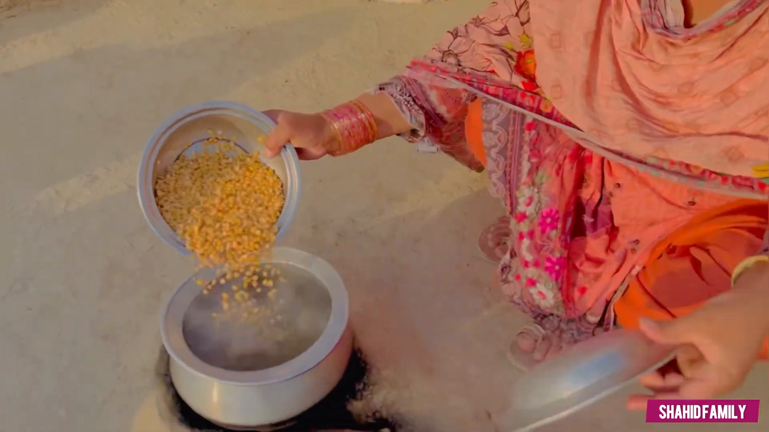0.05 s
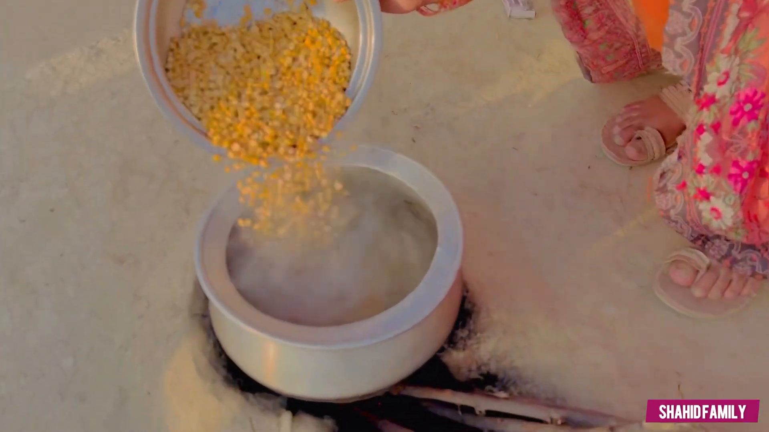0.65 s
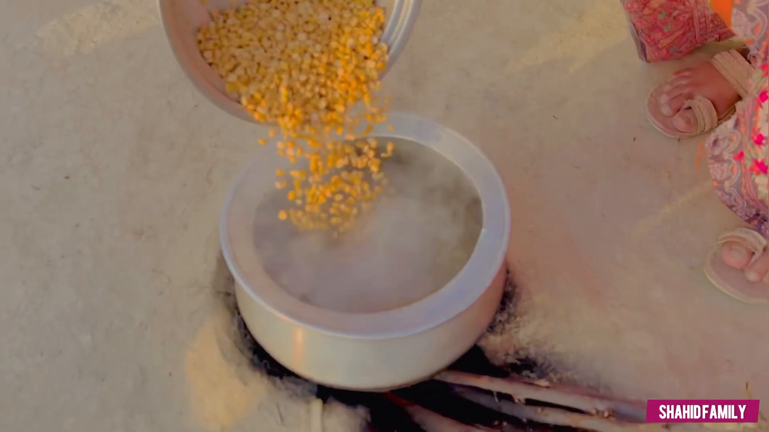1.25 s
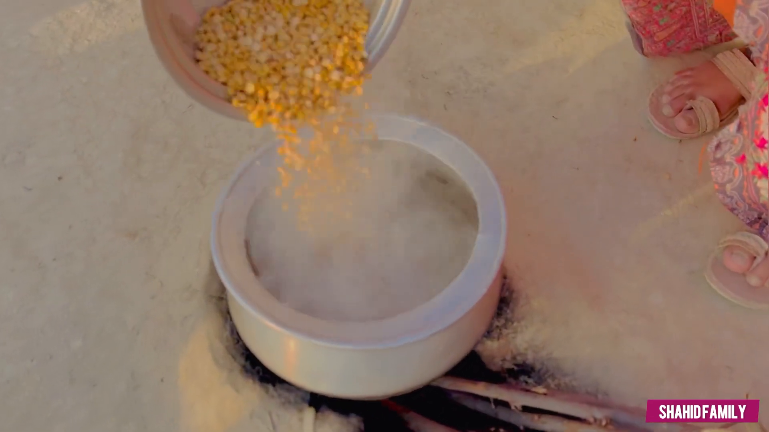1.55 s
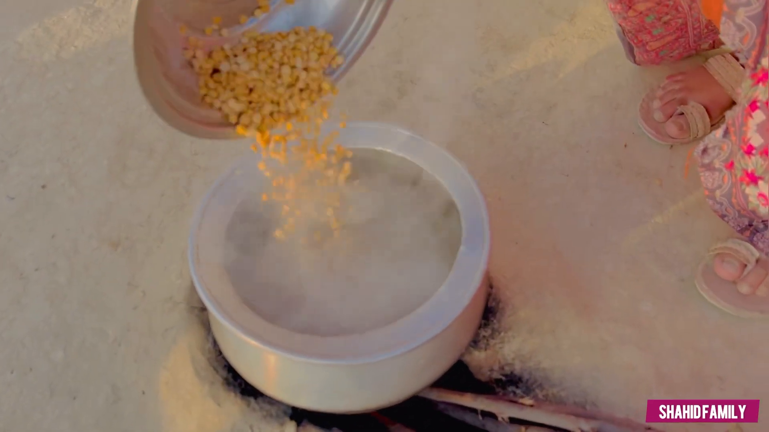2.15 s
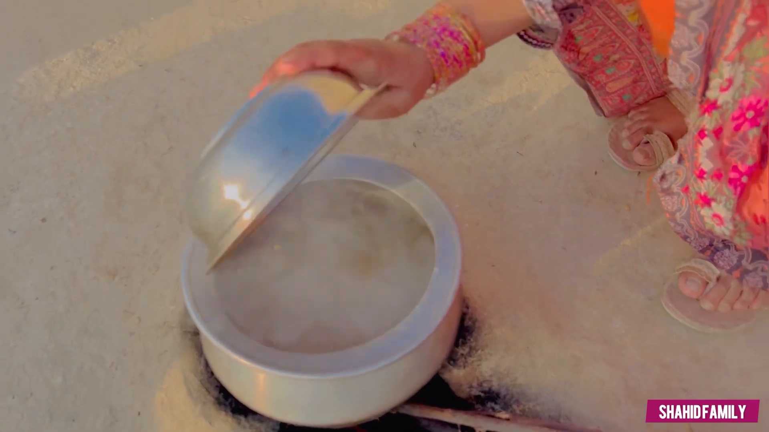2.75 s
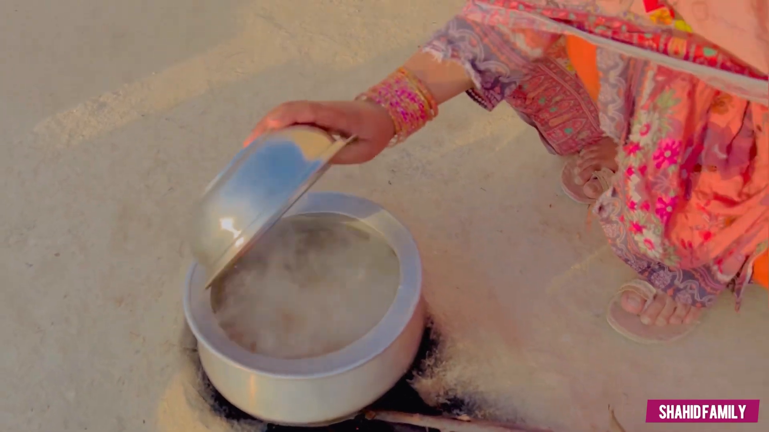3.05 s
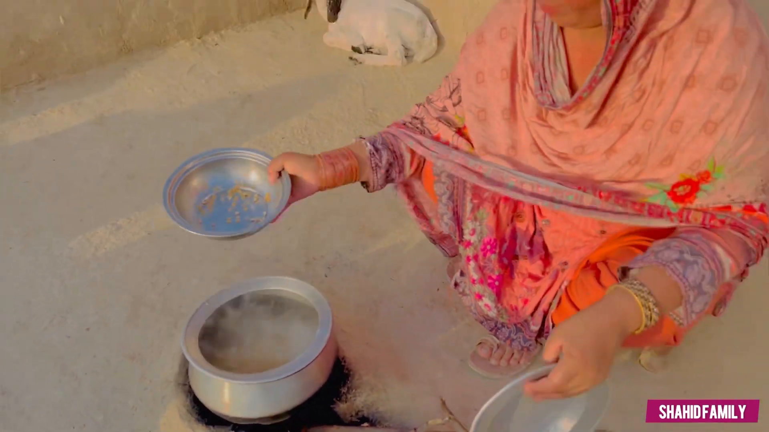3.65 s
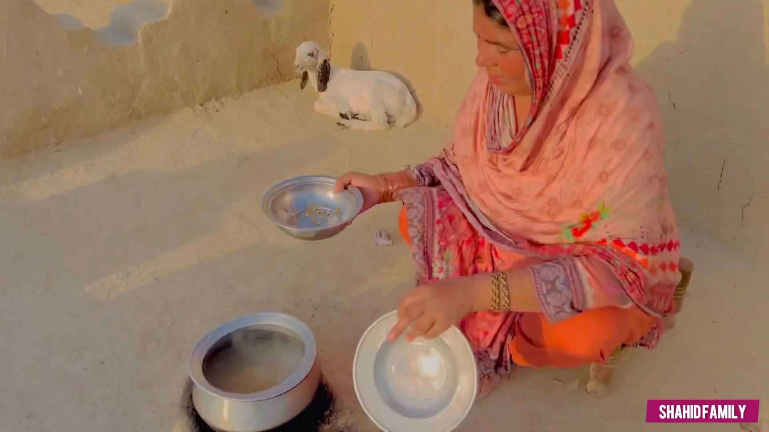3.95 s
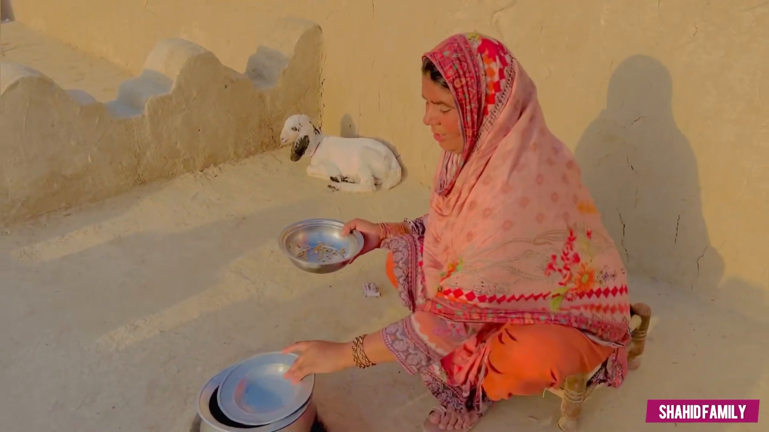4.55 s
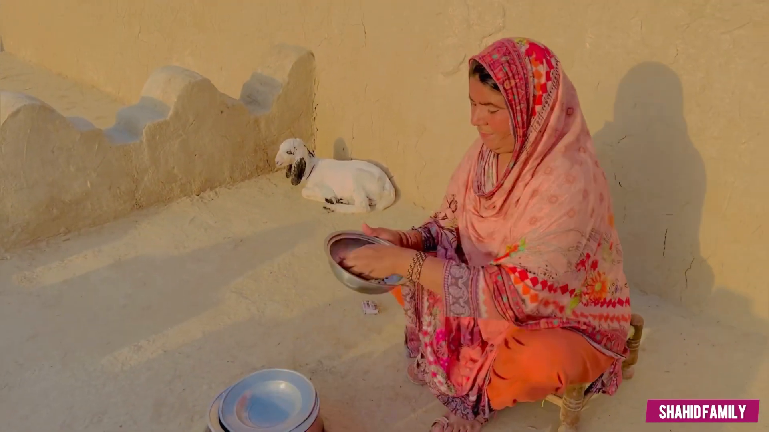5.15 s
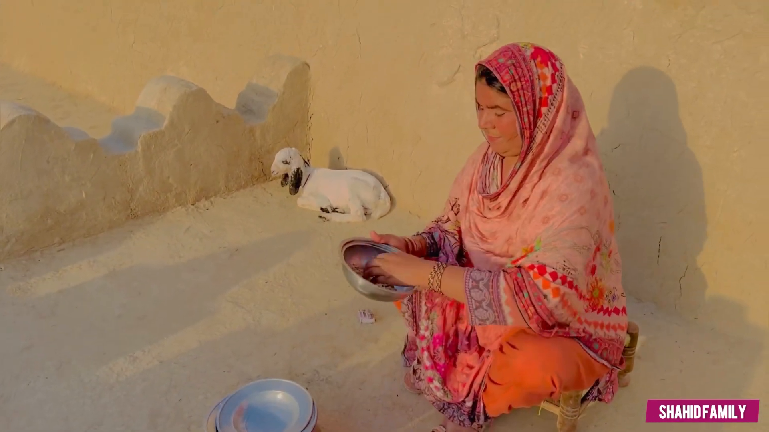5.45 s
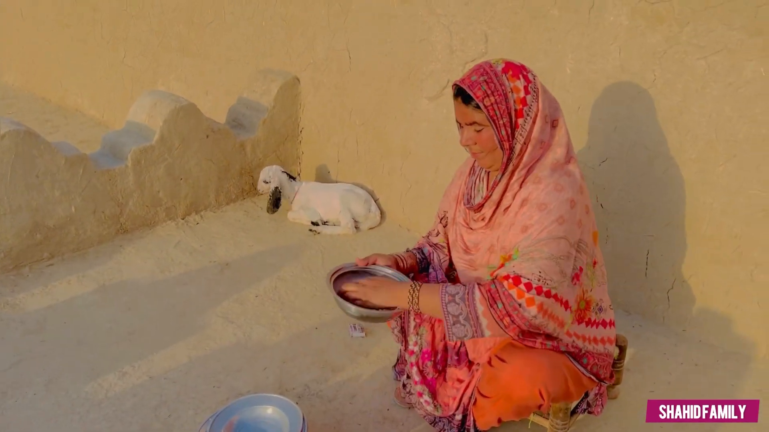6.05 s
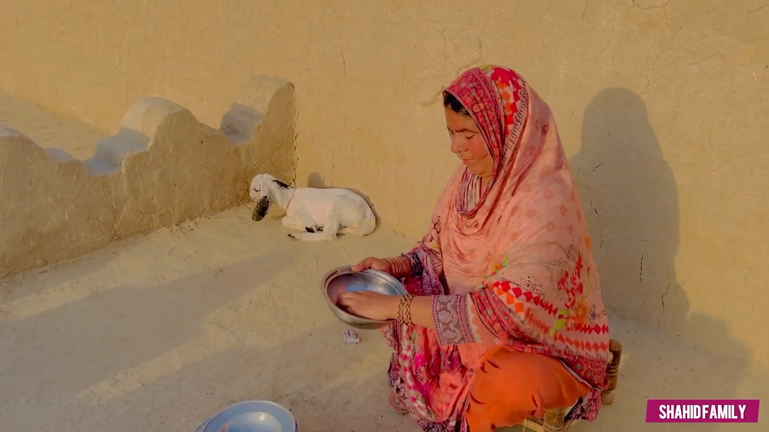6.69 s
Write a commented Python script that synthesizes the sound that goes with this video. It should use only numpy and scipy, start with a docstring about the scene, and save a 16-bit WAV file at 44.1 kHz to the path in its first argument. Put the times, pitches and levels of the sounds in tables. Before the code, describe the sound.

From the start, dry lentils slide out of a steel bowl in a bright, pattering stream that grows louder, with soft plops as they land in a pot of water. The stream runs out around 2.4 seconds, and the last lentils tick down until 2.7. The bowl knocks on the pot's rim at about 2.8, 3.1 and 3.3 seconds, the first and last loudest, each a short clank with a low thud. A sleeve rustles faintly near 4.1. From 4.3 to 4.7 a metal lid clatters and scrapes into place, followed by four barely audible notes from a distant bird. From 5.3 to about 6.9 seconds, fingers wipe around the gritty bowl in quiet passes, with dull bumps, nail ticks, light pings and faint squeaks. The handling sounds are close, over the hush of a yard and a low breeze on the microphone.

```python
"""Dry lentils slide out of a steel bowl and plop into a pot of hot water in a quiet yard.
The bowl is knocked empty on the rim, a metal lid clatters onto the pot and scrapes into place,
then fingers bump and wipe round the gritty bowl. Each contact rings the steel.
A two-port microphone stands close by, a breeze rumbling on it; far off, a bird calls."""
import sys
import numpy as np
from scipy import signal
from scipy.fft import rfft, irfft
from scipy.io import wavfile
from scipy.ndimage import map_coordinates

SR = 44100
rng = np.random.default_rng(int(sys.argv[2]) if len(sys.argv) > 2 else 0)


def persist_wave(psi):
    """Save psi, clipped to +-1, as 16-bit WAV."""
    counts = np.round(np.clip(psi, -1, 1) * 32767).astype(np.int16)
    wavfile.write(sys.argv[1], SR, np.atleast_2d(counts).T)


N = 300762
TIME, FREQS = np.arange(N) / SR, np.fft.rfftfreq(N, 1 / SR)
RING = TIME[:2 * SR // 5]  # time axis of one impact, 0.4 s
EMPTY_S = 2.442  # the bowl runs empty

# spectrum of lentils sliding on steel: freq_hz, level_db
SLIDE_SPECTRUM = [(300, -42), (1500, -10), (1950, -6.5), (2300, 1), (3100, -0.5), (4000, -0.5), (5200, -3),
                  (6500, 0), (8000, 1), (11800, -2), (14000, -2.5), (15000, -19), (16000, -59.5)]
# resonances of the bowl under the lentils: freq_hz, width_hz, boost_db
BOWL_PEAKS = [(2280, 230, 0.5), (3900, 230, 4.5), (4350, 160, 4), (5440, 120, 2), (6550, 120, 4),
              (7710, 260, 10), (8390, 490, 9), (9410, 360, 13), (11340, 440, 12.5)]
# modes of the empty bowl: pitch_hz, level_db, t60_s
BOWL_MODES = [(2290, 5, 0.13), (3324, 9.5, 0.099), (3810, 5.5, 0.075), (4160, 3.5, 0.058), (5620, 11, 0.1),
              (6320, 7, .09), (8200, -5.5, .09), (9700, -4.5, 0.1)]
# spectrum of grit on steel: freq_hz, level_db
GRIT_SPECTRUM = [(200, -10.5), (1000, -17), (1900, -10.5), (2900, -5.5), (3800, -2), (5000, -1.5),
                 (6800, -9), (7600, 0.5), (10000, 3), (14000, -10), (15000, -19), (16000, -13)]
# the lid landing on the rim: start_s, ring_db, crack_db, favoured_hz
LID_HITS = [(4.279, -19.5, -23, 1823), (4.322, -15.5, -14.5, 1713), (4.326, -16, -25.5, 1454),
            (4.335, -18, -20.5, 1725), (4.363, -25.5, -38.5, 827), (4.381, -22.5, -26, 1770),
            (4.411, -27.5, -30.5, 1172), (4.432, -23.5, -30.5, 1440), (4.445, -23, -41.5, 670),
            (4.529, -22, -29, 707), (4.535, -15.5, -16.5, 1450), (4.544, -18.5, -26.5, 1094),
            (4.579, -28, -36.5, 1120), (4.588, -18, -24.5, 1527), (4.594, -21.5, -29.5, 1092),
            (4.629, -28.5, -29, 1150), (4.646, -19.5, -18.5, 1260), (4.694, -34.5, -41, 1080)]
# passes of the hand round the bowl: start_s, length_s, level_db
HAND_PASSES = [(5.322, .01, -48.5), (5.352, 0.14, -45.5), (5.608, .19, -39.5), (5.799, 0.22, -38),
               (6.105, 0.065, -40), (6.2, .14, -51.5), (6.349, 0.22, -37.5), (6.54, 0.04, -30.5),
               (6.67, 0.18, -37.5)]
# spectrum of skin on the bowl: freq_hz, level_db
FINGER_SPECTRUM = [(80, -3.5), (250, 10), (470, 2), (720, 0.5), (850, 0.5), (1150, -1), (1400, -7.5),
                   (1700, 5), (2100, -11.5), (5000, -9.5)]
# resonances of the hand-held bowl under a fingertip: freq_hz, width_hz, boost_db
FINGER_PEAKS = [(449, 63, 8.5), (578, 71, 11.5), (830, 36, 12), (934, 30, 13.5), (1184, 110, 11.5)]


def amp(db):
    """Decibels to gain."""
    return 10 ** (np.asarray(db) / 20)


def unit(x):
    """Scales to rms 1."""
    return x / np.sqrt(np.mean(x ** 2) + 1e-20)


def read(points, hz):
    """Reads a table on a log-frequency axis."""
    f, value = np.transpose(points)
    return np.interp(np.log(hz + 1), np.log(f + 1), value)


def add(mix, start_s, sound):
    """Mixes a sound in at a time."""
    part = mix[max(round(start_s * SR), 0):][:len(sound)]
    part += sound[:len(part)]


def colour(x, spectrum, peaks=(), size=4096):
    """Minimum-phase filter of energy 1 from a spectrum and resonance peaks."""
    hz = abs(np.fft.fftfreq(size, 1 / SR))
    resonance_db = sum(boost / (1 + (2 * (hz - f) / width) ** 2) for f, width, boost in peaks)
    log_gain = np.log(amp(read(spectrum, hz) + resonance_db))
    taps = np.fft.ifft(np.exp(np.conj(signal.hilbert(log_gain)))).real[:size // 2]
    return signal.oaconvolve(x, taps / np.linalg.norm(taps))[:len(x)]


def clicks(per_s, spread_db, size=N):
    """Random impacts of uneven strength, rms 1."""
    place, height, sign = rng.random((size // 4, 3))[:int(per_s * size / SR) + 1].T
    strengths = amp(spread_db * np.minimum(-np.log(1 - height), 5)) * np.sign(sign - .5)
    return unit(np.bincount((place * size).astype(int), strengths, size))


def wander(per_s):
    """Smooth random motion of rms 1, up to a rate."""
    return unit(irfft(rfft(rng.standard_normal(N)) / (1 + (FREQS / per_s) ** 4), N))


def clumps(per_s, depth_db):
    """Random swelling of a level, up to a rate."""
    return unit(amp(depth_db * wander(per_s)))


def held(start, length, attack_s, release_s, sag_db_per_s=0):
    """Envelope of a movement: attack, a hold that may sag, release."""
    t = TIME - start
    sag = amp(-sag_db_per_s * np.clip(t, 0, length))
    return np.clip(t / attack_s, 0, 1) * sag * np.exp(-np.maximum(t - length, 0) / release_s)


def ring(modes, gains=1):
    """Dying modes of random sign, rms 1 at the start."""
    hz, db, t60 = np.transpose(modes)[:, :, None]
    height = amp(db) * gains * rng.choice([-1, 1], hz.shape)
    partials = height * np.sin(2 * np.pi * hz * RING) * np.exp(-np.log(1000) * RING / t60)
    return partials.sum(0) / np.sqrt(np.sum(height ** 2) / 2)


def struck(modes, favoured_hz, lift_db=15.5, width_octaves=0.1):
    """Ring in which the point of contact brings out the modes near one pitch."""
    octaves = np.log2(np.array(modes)[:, :1] / favoured_hz)
    return ring(modes, amp(lift_db * np.exp(-(octaves / width_octaves) ** 2)))


def shimmer(x, low_hz, high_hz, t60, count=45):
    """Drives the crowd of close upper modes of thin steel."""
    hz = low_hz * (high_hz / low_hz) ** ((np.arange(count) + rng.random(count)) / count)
    return unit(signal.oaconvolve(x, ring([(f, 0, t60) for f in hz]))[:N])


def crack(crack_s, tail_db, tail_s):
    """A burst at the contact and the short dense ring of the metal after it."""
    envelope = np.exp(-RING / crack_s) + amp(tail_db) * np.exp(-RING / tail_s)
    return rng.standard_normal(len(RING)) * envelope


def pips(per_s, low_hz, high_hz, t60):
    """Scattered small impacts, each ringing briefly at its own pitch."""
    out, t = np.zeros(N), RING[RING < t60]
    decay = np.exp(-np.log(1000) * t / t60)
    for when, pitch, height in rng.random((int(per_s * N / SR), 3)):
        hz = low_hz * (high_hz / low_hz) ** pitch
        add(out, when * TIME[-1], height ** 2 * np.sin(2 * np.pi * hz * t) * decay)
    return unit(out)


def glides(notes):
    """Short tones that each bend from one pitch to another."""
    out = np.zeros(N)
    for start, length, first_hz, last_hz, db in notes:
        progress = np.linspace(0, 1, int(length * SR))
        hz = first_hz + (last_hz - first_hz) * progress ** 2
        arch = np.sqrt(abs(np.sin(np.pi * progress)))
        add(out, start, amp(db) * arch * np.sin(2 * np.pi * np.cumsum(hz) / SR))
    return out


def lentil_slide(upright):
    """Lentils patter in clumps over the steel, which is less damped as it is laid bare."""
    # spectrum of the bare steel: freq_hz, level_db
    bare_spectrum = [(2000, -29.5), (3000, -10.5), (3600, -0.5), (6600, 9), (7600, -5), (14000, -32)]
    grains = clicks(per_s=2600, spread_db=2.5) * clumps(per_s=95, depth_db=1.98)
    ringing = amp(-8) * shimmer(grains, low_hz=2205, high_hz=13240, t60=0.06)
    stream = colour(grains + ringing, SLIDE_SPECTRUM, BOWL_PEAKS)
    drift = np.cumsum(.008 * wander(per_s=14))  # the shifting load detunes the bowl by about 0.8%
    detuned = map_coordinates(stream, [np.arange(N) + drift], order=3, mode="mirror")
    surging = unit(detuned) * clumps(per_s=11, depth_db=1.2)
    skitter = clicks(per_s=920, spread_db=4.5)
    skitter = unit(skitter + shimmer(skitter, low_hz=3042, high_hz=9420, t60=0.031))
    bare = colour(skitter, bare_spectrum, BOWL_PEAKS)
    flow = held(0, EMPTY_S, attack_s=0.00052, release_s=0.11)
    return (surging * amp(-30.5 - 11 * upright) + bare * amp(-41 - 37 * upright)) * flow


def water_splash(upright):
    """Lentils plop into the water in the hollow pot; a few strays tick on steel."""
    # spectrum of the splash inside the pot: freq_hz, level_db
    splash_spectrum = [(60, -18.5), (125, -3), (210, -10), (340, -10.5), (460, -5.5), (560, 3), (650, 2.5),
                       (760, 0), (900, -9), (1230, -6), (1450, -15.5), (3000, -28.5)]
    strays = colour(clicks(per_s=90, spread_db=1), SLIDE_SPECTRUM, BOWL_PEAKS)
    plops = pips(per_s=60, low_hz=530, high_hz=820, t60=.045)
    splash = colour(clicks(per_s=1100, spread_db=1), splash_spectrum)
    flow = held(0, EMPTY_S + 0.15, attack_s=0.059, release_s=0.15)
    return (splash + .55 * plops + amp(-4.5) * strays) * amp(-42.5 - 5.5 * upright) * flow


def pour():
    """The stream swells as the bowl tips and runs empty; the last lentils drop singly."""
    # last lentils leaving the bowl: start_s, level_db
    stragglers = [(2.34, -23.5), (2.494, -28.5), (2.503, -26), (2.558, -28), (2.655, -48), (2.678, -40),
                  (2.699, -37.5)]
    upright = 1 - np.minimum(TIME / EMPTY_S, 1) ** 0.52  # 1 at the first trickle, 0 at full tilt
    out = lentil_slide(upright) + water_splash(upright)
    last_s = stragglers[-1][0]
    out *= np.exp(-np.maximum(TIME - last_s, 0) / .06)
    for start, db in stragglers:
        tap = rng.standard_normal(len(RING)) * np.exp(-RING / 0.0046)
        add(out, start, amp(db) * colour(tap, SLIDE_SPECTRUM, BOWL_PEAKS))
    return out


def breeze(calming_db_per_s=0.64):
    """Air moving at the microphone: a slowly calming rumble with a few soft buffets."""
    # spectrum of the rumble: freq_hz, level_db
    wind_spectrum = [(15, -42.5), (42, 3), (65, 1), (120, 2), (200, -8.5), (400, -15), (1500, -52)]
    # soft low buffets: middle_s, level_db, pitch_hz
    buffets = [(0.686, -33.5, 56.2), (3.42, -35.5, 95.2), (3.521, -40, 72), (3.635, -33.5, 64.7),
               (3.978, -39.5, 85), (5.166, -45.5, 230)]
    out = amp(-53.5 - calming_db_per_s * TIME) * colour(rng.standard_normal(N), wind_spectrum)
    for middle, db, hz in buffets:
        puff = np.exp(-((TIME - middle) / 0.0115) ** 2)
        out += amp(db) * puff * np.sin(2 * np.pi * (hz * TIME + rng.random()))
    return out


def yard_air():
    """The steady hush of the yard, separate in each channel."""
    # spectrum of the hush: freq_hz, level_db
    air_spectrum = [(150, -25.5), (250, -10.5), (710, -11.5), (1530, -14), (7980, -27), (9660, -31),
                    (10200, -57.5), (11500, -37), (16000, -74.5)]
    return np.array([colour(rng.standard_normal(N), air_spectrum) for _ in range(2)])


def steel_ticks():
    """Hard grains, fingernails and the lid's edge snap against steel; some touches ring the bowl."""
    # spectrum of a snap: freq_hz, level_db
    snap_spectrum = [(500, -42), (3000, -31.5), (7000, -4.5), (11000, 1), (14000, -9), (16000, -11.5)]
    # hard little snaps: start_s, level_db
    snaps = [(.962, -27), (1.137, -24), (1.999, -16), (2.041, -22), (2.266, -14.5), (2.432, -17),
             (2.466, -20), (2.581, -20), (2.606, -22), (2.927, -10.5), (3.274, -21), (5.703, -24.5),
             (5.838, -22.5), (5.896, -25), (6.392, -22.5), (6.777, -28)]
    # nails and a light touch of the rim ringing the bowl: start_s, level_db, favoured_hz
    pings = [(2.927, -40.5, 2630), (5.561, -32.5, 2700), (5.811, -38.5, 4200), (6.095, -42.5, 5270),
             (6.574, -33.5, 4330), (6.586, -38.5, 2290)]
    out = np.zeros(N)
    nails = [(start, db + 7.5) for start, _, db in HAND_PASSES]
    edges = [(start, crack_db - 5.5) for start, _, crack_db, _ in LID_HITS]
    for start, db in list(snaps) + nails + edges:
        snap = crack(crack_s=.0017, tail_db=-20, tail_s=.008)[:SR // 10]
        add(out, start, amp(db + 3) * colour(snap, snap_spectrum))
    for start, db, favoured_hz in pings:
        bowl = struck(BOWL_MODES, favoured_hz)
        contact = colour(crack(crack_s=0.014, tail_db=-15, tail_s=0.012), GRIT_SPECTRUM)
        add(out, start, amp(db) * (amp(4.5) * bowl + amp(3.5) * contact))
    return out


def pot_boom(rise_s, start_hz, end_hz, sag_s):
    """The heavy pot's low thud swells after the blow while its pitch sinks."""
    hz = end_hz + (start_hz - end_hz) * np.exp(-RING / sag_s)
    swell = (RING / rise_s * np.exp(1 - RING / rise_s)) ** 2
    return swell * np.sin(2 * np.pi * np.cumsum(hz) / SR)


def rim_knocks():
    """The hand-damped bowl strikes the rim, each time at another spot; the pot rings and booms."""
    # spectrum of bowl meeting rim: freq_hz, level_db
    knock_spectrum = [(60, -24), (120, -15.5), (250, -5), (400, -8), (600, 0), (950, 1), (1300, -14),
                      (1700, -3.5), (2050, -16), (2400, -3), (3100, -15), (4600, -12), (6000, -16.5),
                      (10000, -17.5), (15500, -36.5)]
    # modes of the pot: pitch_hz, level_db, t60_s
    pot_modes = [(186, -9, 0.22), (406, -15, 0.1), (517, -4, 0.073), (630, -5.5, 0.083),
                 (675, -10.5, 0.067), (932, -14.5, 0.2), (1053, -5, 0.074), (1680, -12, .11),
                 (1845, -12.5, 0.12), (2290, -8.5, .1), (2420, -2.5, 0.073), (3360, -4, 0.049),
                 (3940, -12.5, 0.11), (4563, 6, 0.022), (5270, -10, .04)]
    # blows on the rim: start_s, clank_db, boom_db
    blows = [(2.828, -6.5, -29), (2.857, -20, -30.5), (3.105, -15.5, -28.5), (3.2734, -7.5, -25.5)]
    out = np.zeros(N)
    boom = pot_boom(rise_s=0.019, start_hz=167, end_hz=113.5, sag_s=0.014)
    for start, clank_db, boom_db in blows:
        metal = ring(pot_modes, gains=amp(2.5 * rng.standard_normal((len(pot_modes), 1))))
        contact = colour(crack(crack_s=0.0044, tail_db=-13.5, tail_s=0.023), knock_spectrum)
        clank = amp(-4.5) * contact + amp(-5) * metal
        add(out, start, amp(clank_db) * clank + amp(boom_db) * boom)
    return out


def lid_clatter(seated_s=4.715, choke_s=0.057):
    """Each landing rings the lid and chokes the ring before it; the edge skids along the rim."""
    # modes of the lid: pitch_hz, level_db, t60_s
    lid_modes = [(476, -10.5, 0.16), (664, -13.5, 0.18), (830, -12, 0.055), (1110, -13, 0.13),
                 (1250, -13.5, 0.076), (1470, -8.5, .26), (1560, -13, 0.25), (1708, -9, 0.21),
                 (1880, -12, 0.15), (2192, -12.5, 0.098), (3160, -15, 0.072), (3230, -8, .1),
                 (3460, -9, 0.054), (4440, -21.5, 0.42), (4900, -7.5, 0.077), (5550, -33.5, .12)]
    # spectrum of lid meeting rim: freq_hz, level_db
    clatter_spectrum = [(60, -38), (150, -5.5), (350, -15.5), (700, -10.5), (1100, -4.5), (1600, -10),
                        (2700, -11), (4800, -14.5), (7000, -21.5), (9000, -16), (12000, -35.5),
                        (15500, -46)]
    # skids along the rim: start_s, length_s, level_db
    skids = [(4.344, 0.11, -27), (4.53, 0.14, -33)]
    out = np.zeros(N)
    next_times = [hit[0] for hit in LID_HITS[1:]] + [seated_s]
    for (start, ring_db, crack_db, favoured_hz), next_s in zip(LID_HITS, next_times):
        bend = 1 + 0.009 * rng.uniform(-1, 1)  # pressure on the rim bends the pitch
        choke = np.exp(-np.maximum(start + RING - next_s, 0) / choke_s)
        plate = struck(np.array(lid_modes) * [bend, 1, 1], favoured_hz) * choke
        contact = colour(crack(crack_s=0.0039, tail_db=-5, tail_s=0.017), clatter_spectrum)
        add(out, start, amp(ring_db) * plate + amp(crack_db) * contact)
    skidding = sum(amp(db) * held(start, length, attack_s=.008, release_s=0.038, sag_db_per_s=21)
                   for start, length, db in skids)
    chatter = pips(per_s=220, low_hz=560, high_hz=1900, t60=.035) * skidding
    friction = clicks(per_s=800, spread_db=-0.5) * skidding
    scrape = colour(friction, clatter_spectrum, peaks=[(763, 1400, 9.2), (1735, 270, 3.2)])
    return out + amp(-3) * (scrape + chatter)


def distant_bird():
    """Four faint notes from far off."""
    # the notes: start_s, length_s, first_hz, last_hz, level_db
    chirps = [(4.73, .035, 2850, 2880, -65), (4.79, .035, 2860, 2790, -63), (4.83, .035, 2460, 2400, -67),
              (4.865, .03, 2730, 2790, -63)]
    return glides(chirps)


def hand_wipe():
    """A sleeve rustles; grit crackles under the hand and rings the bowl; the palm rubs dully."""
    # sleeve rustling as the arms move: middle_s, level_db, length_s
    rustles = [(3.656, -67.5, 1), (3.775, -61, 0.073), (3.605, -65, 0.022), (4.106, -45.5, 0.049),
               (5.17, -56.5, 0.016), (5.264, -55.5, 0.058)]
    grit_peaks = [(2290, 150, 3.5), (3340, 130, 5), (3700, 150, 4), (4200, 180, 5), (5660, 200, 6)]
    fine = colour(clicks(per_s=4000, spread_db=3), GRIT_SPECTRUM, grit_peaks)
    fine *= clumps(per_s=60, depth_db=3.4)
    scratch = rng.standard_normal(len(RING)) * np.exp(-RING / .0015)
    scratches = signal.oaconvolve(clicks(per_s=90, spread_db=2), scratch)[:N]
    coarse = unit(colour(scratches, GRIT_SPECTRUM))
    grit = unit(fine + .7 * coarse) * clumps(per_s=22, depth_db=1.5)
    palm = colour(clicks(per_s=390, spread_db=2.5), FINGER_SPECTRUM, FINGER_PEAKS)
    singing = unit(signal.oaconvolve(clicks(per_s=600, spread_db=8.5), ring(BOWL_MODES))[:N])
    rubbing = np.max([amp(db) * held(start, length, attack_s=0.002, release_s=0.042, sag_db_per_s=5)
                      for start, length, db in HAND_PASSES], axis=0)
    sleeve = sum(amp(db) * np.exp(-(2 * (TIME - middle) / length) ** 2)
                 for middle, db, length in rustles)
    return (grit + amp(-15) * singing + amp(-18) * palm) * rubbing + fine * sleeve


def finger_drags():
    """Fingertips drag over the bowl in tiny slips and now and then squeak."""
    # drags: middle_s, level_db, length_s
    strokes = [(5.362, -42.5, 0.075), (5.474, -50, 0.12), (5.663, -51, 0.14), (5.755, -50, 0.043),
               (6.225, -48.5, 0.37), (6.506, -41.5, 0.067), (6.715, -51, 0.25)]
    # squeaks on the steel: start_s, length_s, first_hz, last_hz, level_db
    squeaks = [(6.09, 0.13, 196, 172, -43), (6.25, 0.14, 198.6, 160, -47), (6.342, 0.132, 800, 672, -52.5)]
    out = np.zeros(N)
    half_s = RING[-1] / 2
    for middle, db, length in strokes:
        slips = colour(clicks(per_s=260, spread_db=1.5, size=len(RING)), FINGER_SPECTRUM, FINGER_PEAKS)
        swell = np.exp(-(2 * (RING - half_s) / length) ** 2)
        add(out, middle - half_s, amp(db) * slips * swell)
    return out + glides(squeaks)


def finger_bumps():
    """Fingertips catch on the wall of the bowl with a dull, gritty knock."""
    # catches: start_s, level_db, favoured_hz
    bumps = [(5.325, -43.5, 350), (5.378, -44, 563), (5.461, -38.5, 940), (5.618, -33.5, 260),
             (5.646, -33, 1070), (5.746, -39, 980), (5.992, -37, 1130), (6.236, -41, 700), (6.28, -42, 750),
             (6.56, -57, 330), (6.677, -35.5, 890), (6.734, -38, 830)]
    out = np.zeros(N)
    for start, db, favoured_hz in bumps:
        catch = clicks(per_s=1500, spread_db=1, size=len(RING)) * np.exp(-RING / 0.0082)
        peaks = FINGER_PEAKS + [(favoured_hz, 250, 9)]
        add(out, start, amp(db + 1.5) * colour(catch, FINGER_SPECTRUM, peaks))
    return out


def cooking():
    """Everything the hands set sounding, close to the microphone."""
    return (pour() + rim_knocks() + lid_clatter() + steel_ticks()
            + hand_wipe() + finger_drags() + finger_bumps())


def scene():
    """Close cooking sounds, spread a little left and right, over the faint air of the yard."""
    # stereo width of the close sounds by frequency: freq_hz, level_db
    spread = [(100, -18), (700, -12), (1400, -5), (2800, -8), (5300, -4), (7000, -5), (9000, -9),
              (10200, -23), (11100, -10), (12000, -17), (13000, -8), (14000, -22), (16000, -10)]
    side = irfft(rfft(cooking()) * amp(read(spread, FREQS)), N)
    close = cooking() + np.array([side, -side])
    return amp(-1) * close + breeze() + distant_bird() + amp(-63.5) * yard_air()


def record(dry):
    """The channels differ in phase and level; the top treble is dulled, loud peaks softly limited."""
    # phase between the ports: freq_hz, left_lead_rad
    port_phase = [(20, 0), (1000, .25), (1300, 0), (1550, -1.4), (3000, 2.0), (4200, .4), (6400, .3),
                  (7400, 1.3), (10200, -3.14), (11800, -6.1), (12500, -6.6), (13800, -9.3), (14600, -9.6),
                  (15100, -12.5)]
    # balance between the ports: freq_hz, left_over_right_db
    port_balance = [(30, 1), (150, 2.4), (600, 3), (1200, 7.5), (1800, 5), (2500, 0), (3500, 6),
                    (5400, 8.5), (6300, 2), (7200, 5), (8200, 0), (16000, 0)]
    lean = amp(read(port_balance, FREQS) / 2)
    ports = np.array([lean, np.exp(-1j * read(port_phase, FREQS)) / lean])
    ports /= np.sqrt((lean ** 2 + lean ** -2) / 2)  # constant total power
    treble_loss = amp(read([(13200, 0), (14500, -7.5)], FREQS))
    heard = irfft(rfft(dry) * ports * treble_loss, N)
    rounded = .9 * np.tanh(heard / .9)
    band_limit = signal.firwin(301, cutoff=16000, window=("kaiser", 9), fs=SR)
    return signal.oaconvolve(rounded, band_limit[None], "same")


dry = scene()
out = record(dry)
persist_wave(out)
```